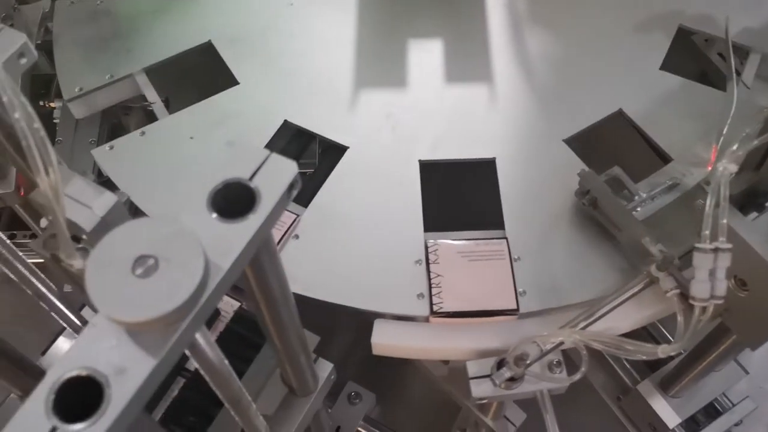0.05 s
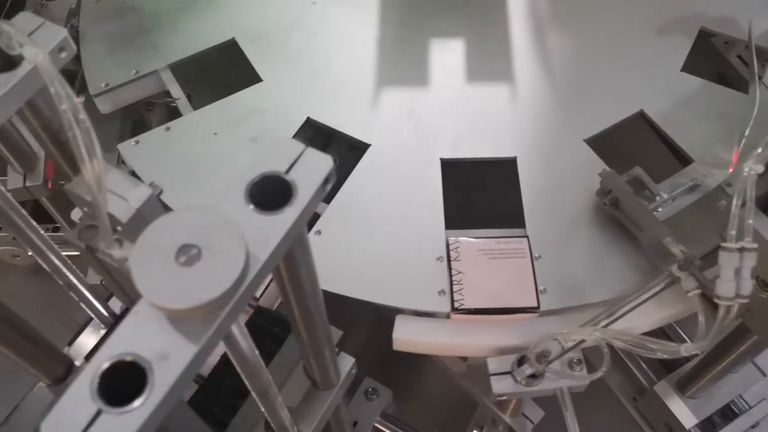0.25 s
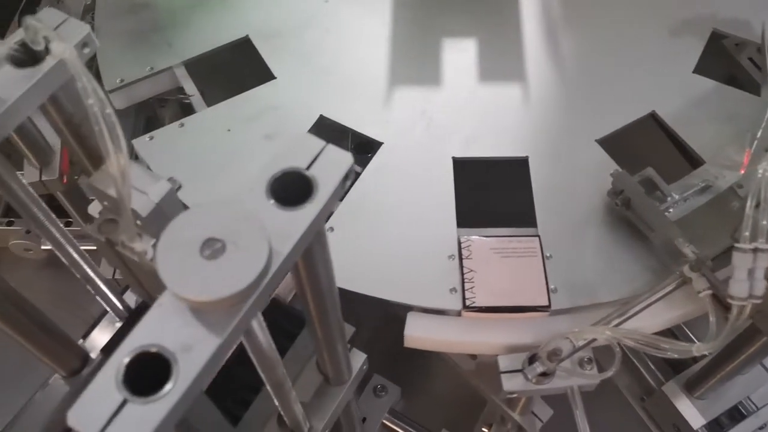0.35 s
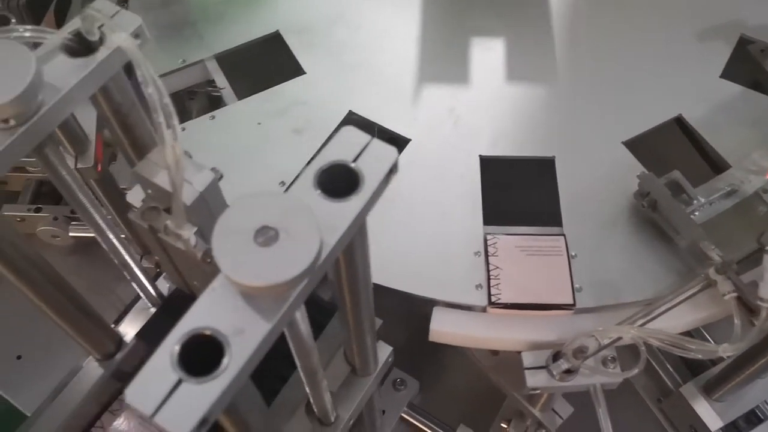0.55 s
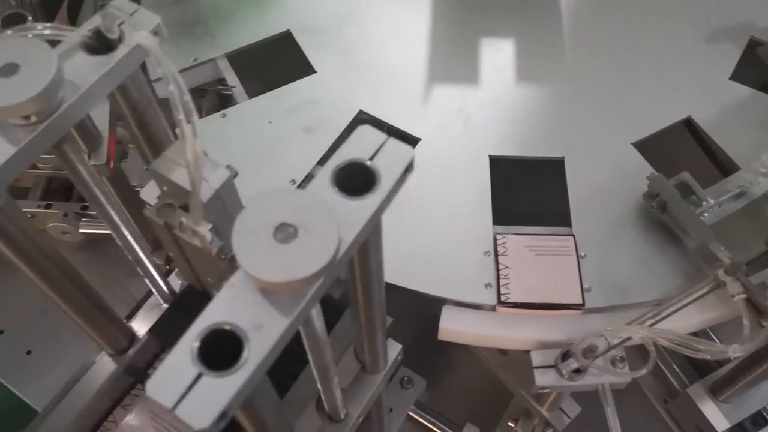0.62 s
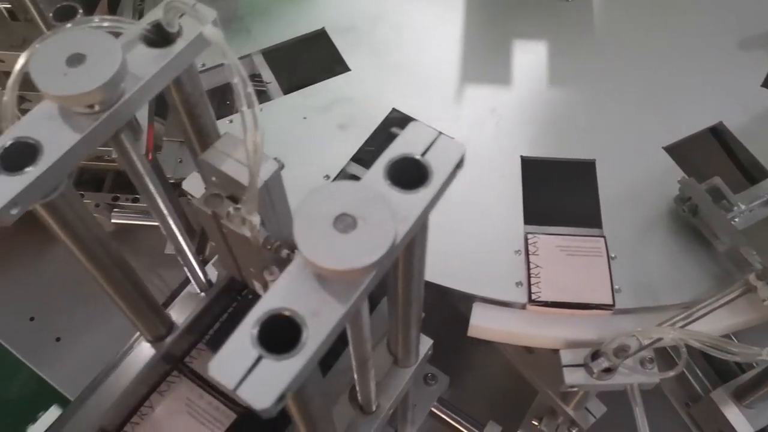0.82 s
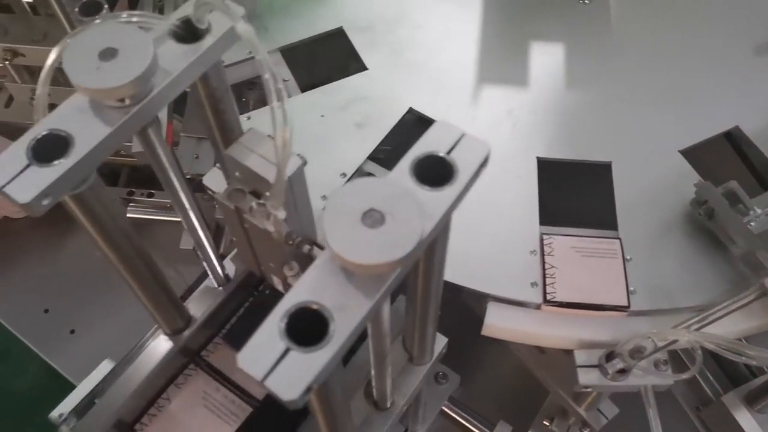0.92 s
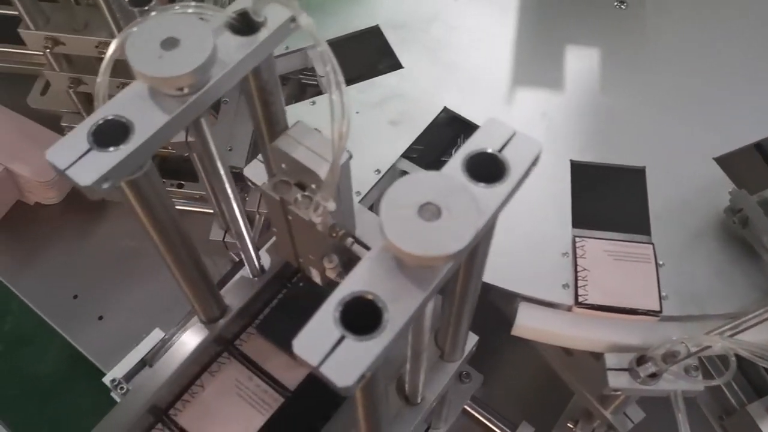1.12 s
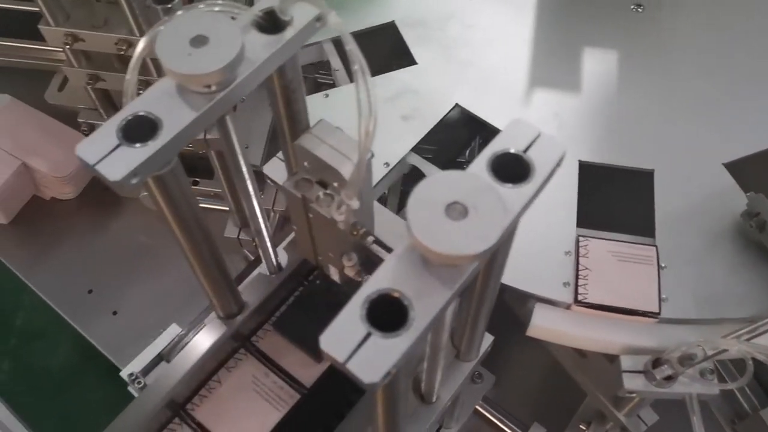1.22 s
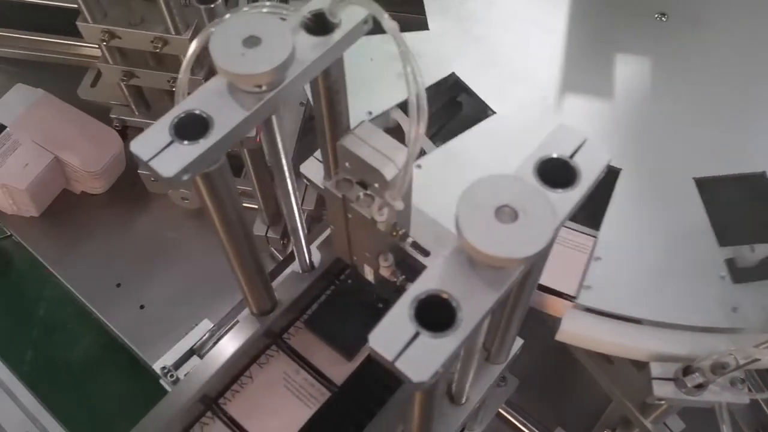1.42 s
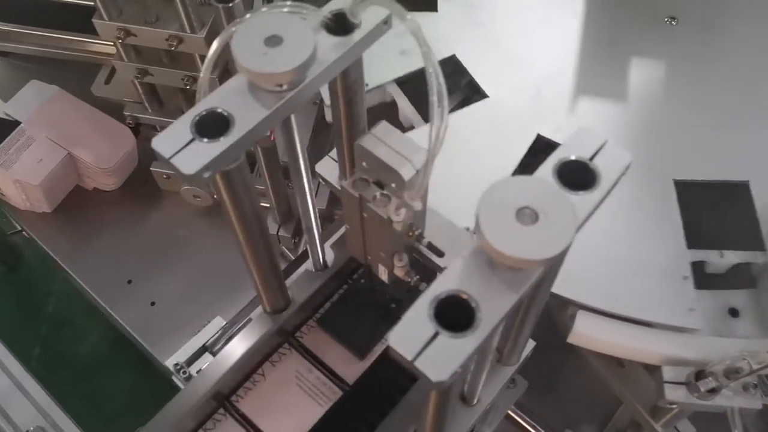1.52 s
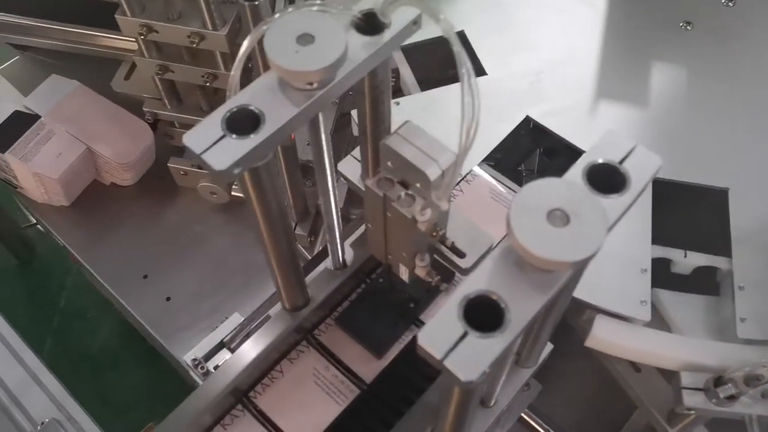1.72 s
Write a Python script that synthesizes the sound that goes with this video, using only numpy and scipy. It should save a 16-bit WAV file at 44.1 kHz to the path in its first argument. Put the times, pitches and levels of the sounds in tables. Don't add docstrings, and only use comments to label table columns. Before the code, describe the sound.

An automatic packaging machine cycles once, thumping, clacking and hissing compressed air in a factory hall

```python
import sys
import numpy as np
from scipy import signal
from scipy.fft import rfft, irfft, next_fast_len
from scipy.io import wavfile

SR = 44100
rng = np.random.default_rng(int(sys.argv[2]) if len(sys.argv) > 2 else 0)


def to_wav(sig):
    pcm = np.clip(np.atleast_2d(sig), -1, 1) * 32767
    pcm = np.round(pcm).astype(np.int16)
    wavfile.write(sys.argv[1], SR, pcm.T)


def invert_db(level):
    return 10 ** (np.asarray(level, dtype=float) / 20)


N = 77175

# start_s, level_db (peak), rattle_s, region_hz (struck region)
BLOWS = [(.311, -18.5, 0.037, 430), (0.338, -29.5, 0.017, 494), (.382, -52, 0.0091, 250),
         (0.578, -32.5, 0.012, 270), (.63, -46, 0.025, 400), (0.752, -12.5, 0.024, 335),
         (0.811, -22, 0.033, 202), (.897, -15.5, 0.015, 353), (0.951, -27.5, 0.17, 194),
         (1.04, -33, 0.0076, 244), (1.128, -28.5, 0.039, 337), (1.301, -40, 0.017, 207),
         (1.449, -29, 0.035, 392), (1.487, -34.5, 0.012, 183), (1.551, -40, 0.014, 220)]
# frequency_hz, likeness (0 to 1)
LIKENESS = [(60, 1), (300, 0.87), (700, 0.89), (1500, 0.14), (12000, 0.018)]
# frequency_hz, level_db, t60_s
GUIDE = [(505, -16, 0.24), (890, -12, 0.18), (1120, 7.5, 0.072), (1400, 4, 0.46), (2132, -16, 0.061),
         (2277, 8.5, 0.093), (2950, -14, 0.062), (3590, -15, 5.0), (4005, -8, 0.1), (4050, -14, 0.062),
         (4400, -16, 0.13), (4820, -17, 0.17)]
# frequency_hz, level_db, t60_s
LATCH = [(1060, -2.5, 0.12), (1417, -0.5, 0.097), (3060, 0, 0.048), (3510, -2, 0.072), (3670, -8.5, 0.051),
         (4950, -34, 2.7), (6422, -19, 0.15), (7000, -17, 0.098), (7500, 2, 0.09), (7300, -18, 0.045),
         (8500, -13, 0.39), (9464, -47, 0.27), (10330, -6.5, 0.14), (10710, -23, 0.047)]
# frequency_hz, level_db, t60_s
FLAP = [(900, -23, .05), (930, -8, 0.036), (1126, 14, 0.094), (1440, -10.5, .05), (1740, -6, 0.032),
        (2520, 1, 0.02), (2900, -9, .06), (3000, -10, 0.062)]
# frequency_hz, level_db, t60_s
STOP = [(1000, -2, 0.13), (1286, 1.5, 0.081), (1615, -3, 0.14), (2040, -13, 0.12), (2130, -17, 0.41),
        (2780, -2, 0.068), (2980, -1.5, 0.033), (3321, -26, 0.13), (3780, -29, 0.063), (4640, -25, 5.0)]
LEFT_LAG = 7
LEFT_RIGHT = np.array([[.5], [-.5]])


def rms_one(x):
    return x / np.sqrt(np.mean(x ** 2) + 1e-20)


def in_time(rows):
    return np.interp(np.arange(N) / SR, *np.transpose(rows))


def at_hz(points, hz):
    table_hz, values = np.array(points).T
    return np.interp(np.log(hz), np.log(table_hz), values)


def ring(x, hz, t60):
    r, w = invert_db(-60 / (t60 * SR)), 2 * np.pi * hz / SR
    return signal.lfilter([0, np.sin(w)], [1, -2 * r * np.cos(w), r * r], x + 1e-18)


def narrow(x, hz, width):
    for _ in range(2):
        x = ring(x, hz, np.log(1000) / (np.pi * width))
    return rms_one(x)


def add(out, s, x, pan_db):
    x = x * np.ones((2, 1))
    for side, (gain_db, lag) in enumerate([(pan_db / 2, LEFT_LAG), (-pan_db / 2, 0)]):
        i = int(s * SR) + lag
        out[side, i:i + x.shape[1]] += invert_db(gain_db) * x[side, :N - i]


def noise(spectrum, patchy_db):
    # frequency_hz, difference_db
    tilt = [(60, 4.5), (550, 2), (2500, 2), (6000, -4), (12000, 6)]
    out, edges = 0, 22 * 2 ** np.arange(0, 9.6, 1 / 4)
    white = rng.standard_normal((2, 2, N))
    for k, (low, high) in enumerate(zip(edges, edges[1:])):
        hz = np.sqrt(low * high)
        flicker = np.interp(np.arange(N) / 900, np.arange(90), rng.standard_normal(90))
        if hz <= spectrum[0][0] / 1.3:
            continue
        band = signal.butter(2, [low, high], "band", fs=SR, output="sos")
        mid, side = signal.sosfilt(band, white[k % 2])
        alike = np.clip(at_hz(LIKENESS, hz), 0, 1)
        mid, side = np.sqrt(1 + alike) * mid, np.sqrt(1 - alike) * side
        pair = np.array([np.roll(mid + side, LEFT_LAG), mid - side])
        level_db = at_hz(spectrum, hz) + patchy_db * flicker + at_hz(tilt, hz) * LEFT_RIGHT
        out = out + invert_db(level_db) * pair
    return rms_one(out)


def strike(modes, db, rattle_s, touches_per_s, uneven_db, detune=0.012):
    t = np.arange(SR // 5) / SR
    draw = rng.random((2, len(t)))
    touches = (draw[0] < touches_per_s / SR) * (2 * draw[1] - 1)
    touches = touches * np.exp(-(t / max(rattle_s, 1e-4)) ** 2)
    touches[0] = .7
    x = 0
    for (hz, d, t60), (u, v, w) in zip(modes, rng.standard_normal((len(modes), 3))):
        y = invert_db(d + uneven_db * u) * ring(touches, hz * (1 + detune * v), t60)
        turn = np.arccos(np.clip(at_hz(LIKENESS, hz), 0, 1)) * np.sign(w)
        quadrature = np.gradient(y) * SR / (2 * np.pi * hz)
        x = x + np.array([y, np.cos(turn) * y + np.sin(turn) * quadrature])
    edges = np.array([.8, 1.6]) * [modes[0][0], modes[-1][0]]
    x = signal.sosfilt(signal.butter(2, edges, "band", fs=SR, output="sos"), x)
    return invert_db(db) * x / np.abs(x).max()


def cluster(centre_hz, spread_oct, cycles):
    octaves = np.linspace(-1.7, 2.3, 12) + rng.uniform(-.15, .15, 12)
    hz = centre_hz * 2 ** (octaves * spread_oct)
    return [(f, -3.0 * o ** 2, cycles / centre_hz) for f, o in zip(hz, octaves)]


def coupled_ring(db, hz, cycles):
    click = np.arange(SR // 10) == np.array([[5], [0]])
    wall = ring(click, hz * 1.057, cycles / hz)
    x = ring(wall, hz * 0.964, cycles / hz)
    return invert_db(db) * x / np.abs(x).max()


def rumble():
    # frequency_hz, width_hz, level_db
    resonances = [(88, 21, -13), (124, 13, -41), (172.5, 18.3, 0), (268.3, 33, -2), (347, 107, -5),
                  (499.5, 82, -10)]
    rest_db, shake_db, shake_t60_s = -53, -13, 0.56
    t = np.arange(N) / SR
    power = invert_db(2 * rest_db)
    for s, db, *_ in BLOWS:
        power = power + invert_db(2 * (db + shake_db - 60 * abs(t - s) / shake_t60_s)) * (t > s)
    x = sum(invert_db(db) * narrow(rng.standard_normal(N), hz, width) for hz, width, db in resonances)
    return np.sqrt(power) * rms_one(x) * invert_db(2.5 * LEFT_RIGHT)


def hall_noise():
    # frequency_hz, level_db
    spectrum = [(15, -44), (25, -5), (166, 3.5), (503, -5), (4140, -23.5), (7710, -27.5), (11600, -45),
                (16000, -71)]
    return invert_db(-48 + 1) * noise(spectrum, patchy_db=4.0)


def leak():
    # time_s, level_db
    flow = [(0, -66.5), (.14, -68), (.158, -42.5), (.22, -38.5), (.235, -38), (.29, -36.5), (.37, -41.5),
            (.41, -47.5), (.45, -42), (.56, -46), (.64, -49.5), (.70, -73), (.745, -45.5), (.76, -34.5),
            (1.11, -53.5), (1.14, -41), (1.3, -51.5), (1.4, -52.5), (1.75, -82)]
    # frequency_hz, level_db (per Hz)
    spectrum = [(880, -9), (1500, -9.5), (2340, 0), (3270, -0.5), (5100, 0), (6240, -5.5), (10900, -9),
                (15000, -26)]
    return invert_db(in_time(flow)) * noise(spectrum, patchy_db=2.5)


def thumps():
    # start_s, level_db (peak), pitch_hz, t60_s
    stops = [
        (0.137, -17, 114, 0.071),
        (0.226, -9.5, 98.3, 0.074),
        (0.495, -18, 98, 0.035),
        (0.729, -24, 94.5, 0.14),
        (0.782, -23, 88, 0.099),
        (0.924, -27, 88, 0.23),
        (1.009, -23, 97, 0.077),
        (1.14, -29.5, 89.6, 0.11),
    ]
    out, t = np.zeros((2, N)), np.arange(SR // 4) / SR
    for s, db, hz, t60 in stops:
        onset = 1 - np.exp(-t / 0.012)
        add(out, s, -invert_db(db - 60 * t / t60) * np.sin(2 * np.pi * hz * t) * onset, 5.5)
    return out


def whistles():
    # start_s, end_s, pitch_hz, width_hz, level_db
    tones = [(0.161, 0.202, 2440, 380, -45.5), (0.26, 0.61, 5460, 885, -48),
             (0.607, 0.62, 10000, 450, -45.5), (1.152, 1.23, 4720, 915, -43),
             (1.309, 1.304, 8000, 403, -41), (0.156, 0.2, 10700, 1210, -51), (1.437, 1.5, 2450, 700, -53)]
    t, out = np.arange(N) / SR, 0
    for start, end, hz, width, db in tones:
        gate = np.clip((t - start) / 0.0031, 0, 1) * np.exp(-np.maximum(t - end, 0) / 0.029)
        out = out + invert_db(db) * gate * narrow(rng.standard_normal((2, N)), hz, width)
    return out


def pushes():
    # start_s, level_db (peak), pitch_hz
    events = [(.18, -31.5, 142), (.197, -33.5, 137), (.226, -29.5, 416), (.282, -36, 144), (.327, -18, 320),
              (.3385, -21, 473), (.381, -27.5, 334), (.901, -22, 305), (1.532, -29.5, 254)]
    out = np.zeros((2, N))
    for s, db, hz in events:
        add(out, s, coupled_ring(db, hz, cycles=3.25), 3.0)
    return out


def knocks():
    # start_s, level_db (peak), centre_hz, rattle_s
    events = [(.298, -20.5, 1056, 0.018), (0.311, -13.5, 1170, 0.0018), (.345, -30, 810, 0.024),
              (.227, -43.5, 950, 0.027), (.628, -36, 567, 0.028), (.752, -23.5, 770, 0.035),
              (0.86, -23, 1030, 0.0072), (.896, -25, 860, 0.031), (1.037, -28, 1170, 0.03),
              (1.128, -26.5, 1055, 0.0142), (1.256, -22, 953, 0.01), (1.273, -28.5, 1290, 0.053),
              (1.344, -33, 1026, 0.0078), (1.453, -34.5, 670, 0.025), (1.625, -36, 750, 0.0095)]
    out = np.zeros((2, N))
    for s, db, hz, rattle_s in events:
        modes = cluster(hz, spread_oct=.2, cycles=13)
        add(out, s, strike(modes, db + 4.0, rattle_s, 1300, 5.7), .8)
    return out


def clacks():
    # start_s, level_db (peak), centre_hz, rattle_s
    events = [(0.3112, -17.5, 2330, 0.015), (0.3406, -13, 2400, 0.0027), (0.35, -20, 3920, 0.012),
              (0.572, -17.5, 4260, 0.03), (0.75, -15.5, 2383, 0.047), (0.839, -18.5, 2450, 0.0032),
              (0.8525, -18.5, 3080, 0.0027), (0.894, -21.5, 2300, 0.032), (1.0388, -24, 2920, 0.014),
              (1.132, -19, 2290, 0.01), (1.315, -37, 3120, 0.0074), (.23, -26, 2590, 0.042)]
    out = np.zeros((2, N))
    for s, db, hz, rattle_s in events:
        modes = cluster(hz, spread_oct=0.2, cycles=39)
        add(out, s, strike(modes, db + 0.5, rattle_s, 2200, 0.47), 3.0)
    return out


def snaps():
    # start_s, level_db (peak), pitch_hz
    events = [
        (.8527, -5.5, 1052),
        (1.2625, -18, 1170),
        (.2985, -21, 950),
        (.312, -15, 1120),
    ]
    out = np.zeros((2, N))
    for s, db, hz in events:
        add(out, s, coupled_ring(db, hz, cycles=9.1), 1.5)
    return out


def puffs():
    # start_s, level_db (peak), hold_s, t60_s
    openings = [(0.305, -33.5, 0.025, 0.085), (0.343, -34, 0.0082, 0.024), (0.4325, -25.5, 0.0062, 0.12),
                (0.5716, -31, 0.023, 0.092), (0.594, -34, 0.011, 0.066), (0.7516, -22, 0.0045, 0.11),
                (0.849, -28, 0.0067, 0.35), (0.897, -21.5, 0.006, 0.19), (1.034, -36, 0.017, 0.12),
                (1.121, -30.5, 0.0089, 0.11), (1.13, -27.5, 0.0052, 0.18), (1.3116, -35.5, 0.0035, 0.19)]
    # frequency_hz, level_db (per Hz)
    spectrum = [(1350, -3.5), (2300, -1), (3120, -1), (4590, -10), (5580, 0.5), (6080, -6), (9900, -7.5),
                (15000, -63)]
    power, t = np.zeros((2, N)), np.arange(SR // 3) / SR
    for s, db, hold_s, t60 in openings:
        decay = invert_db(2 * (db - 4.5 - 60 * np.maximum(t - hold_s, 0) / t60))
        crack = 1 + 1.5 * np.exp(-t / 0.0043)
        add(power, s, decay * crack, 0)
    return np.sqrt(power) * noise(spectrum, patchy_db=0.0)


def frame_blows():
    # frequency_hz, level_db, t60_s
    frame = [(188.5, -5, 0.28), (237, -8.5, 0.1), (263, -3, 0.028), (331.4, -5.5, 0.14), (385, -7.5, 0.11),
             (455, -6.5, 0.11), (522.6, 0, 0.1), (570, -9, 0.042), (750, -1, 0.12), (814, 5.5, 0.076)]
    out = np.zeros((2, N))
    for s, db, rattle_s, region_hz in BLOWS:
        modes = [(hz, d - 10.5 * np.log2(hz / region_hz) ** 2, t60) for hz, d, t60 in frame]
        add(out, s, strike(modes, db, rattle_s, 400, 4.9), 3.5)
    return out


def parts():
    # start_s, level_db (peak), rattle_s, modes
    rattles = [
        (.3405, -18, 0.016, GUIDE),
        (0.4281, -14.5, 0.011, LATCH),
        (1.2505, -18, .014, FLAP),
        (1.446, -22.5, 0.0098, STOP),
    ]
    out = np.zeros((2, N))
    for s, db, rattle_s, modes in rattles:
        damped = [(hz, d, min(t60, .026)) for hz, d, t60 in modes]
        add(out, s, strike(damped, db, rattle_s, 2700, 0, 0), 2.5)
    return out


def room(x):
    t60_s, wall_cut_hz = 0.25, 2700
    size = next_fast_len(N + SR)
    w = 2 * np.pi * np.arange(size // 2 + 1) / size
    x = signal.lfilter(*signal.butter(2, 300, "high", fs=SR), x)
    dull = 1 / (1 + 1j * w * SR / (2 * np.pi * wall_cut_hz))
    lags = rng.uniform(0.0065, .04, (2, 8, 1)) * SR
    loop = invert_db(-60 * lags / SR / t60_s) * dull * np.exp(-1j * w * lags)
    signs = (-1) ** np.arange(8)[:, None]
    echoes = (signs * loop / (1 - loop)).sum(1)
    return irfft(rfft(x.mean(0), size) * echoes, size)[:, :N]


def turned(x):
    # time_s, left_right_db
    drift = [(0, -1), (.7, 0.5), (.9, -1), (1.3, -2.5), (1.75, 0)]
    low = signal.sosfilt(signal.butter(1, 200, fs=SR, output="sos"), x)
    return low + (x - low) * invert_db(in_time(drift) * LEFT_RIGHT)


def scene():
    contacts = thumps() + pushes() + knocks() + clacks() + snaps() + frame_blows()
    hits = signal.sosfilt(signal.butter(4, 66, "high", fs=SR, output="sos"), contacts)
    air = leak() + whistles() + puffs()
    return turned(hits + invert_db(-11.5) * room(hits) + air + rumble() + hall_noise() + parts())


def band_limit(x):
    return signal.sosfilt(signal.butter(12, 16170, fs=SR, output="sos"), x)


def record(dry):
    x = signal.sosfilt(signal.butter(2, 5.7, "high", fs=SR, output="sos"), dry)
    x = signal.sosfilt(signal.butter(10, 15200, fs=SR, output="sos"), x)
    return band_limit(x)


dry = scene()
out = record(dry)
to_wav(out)
```